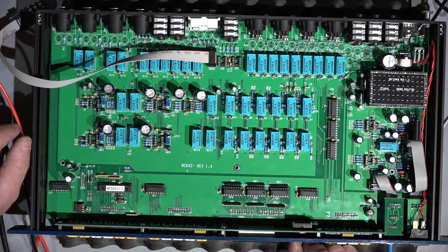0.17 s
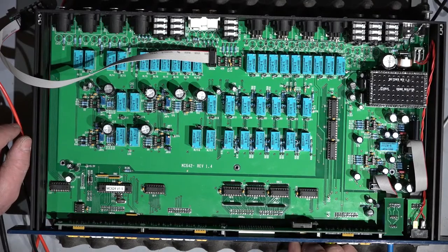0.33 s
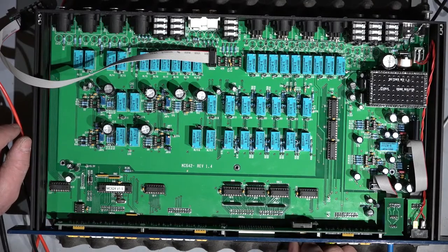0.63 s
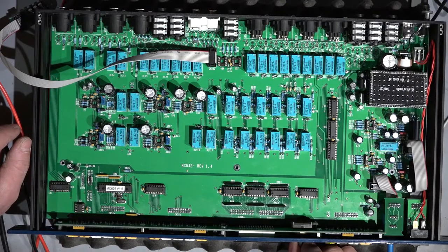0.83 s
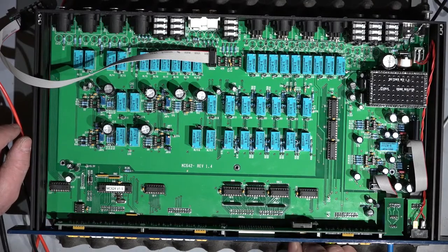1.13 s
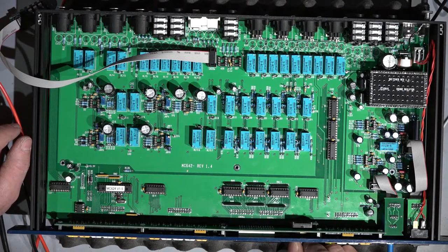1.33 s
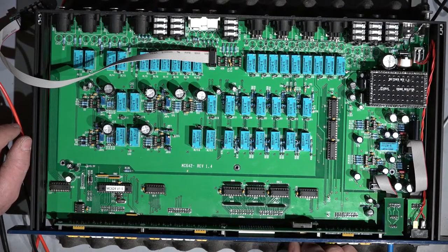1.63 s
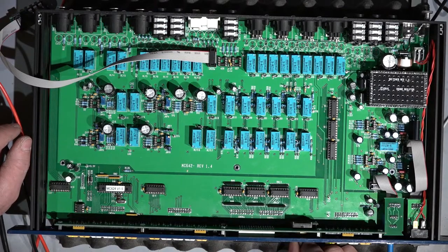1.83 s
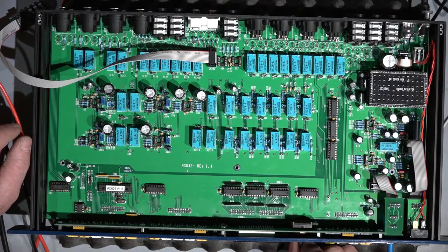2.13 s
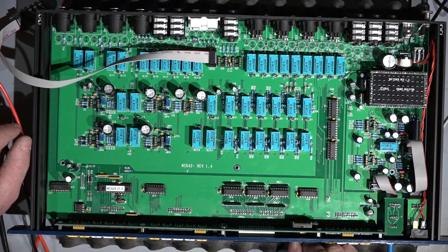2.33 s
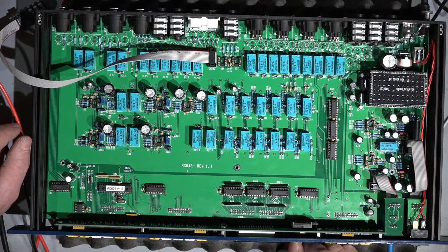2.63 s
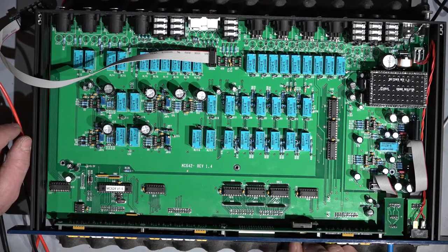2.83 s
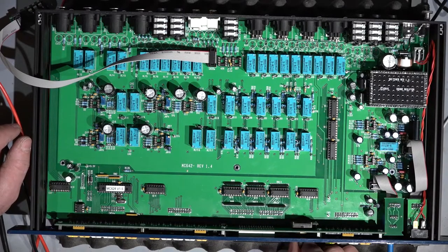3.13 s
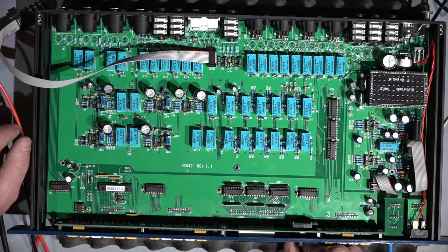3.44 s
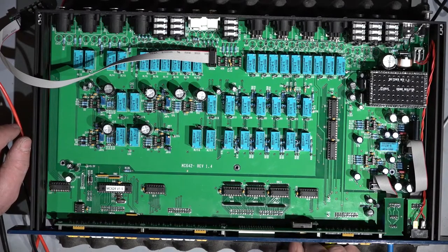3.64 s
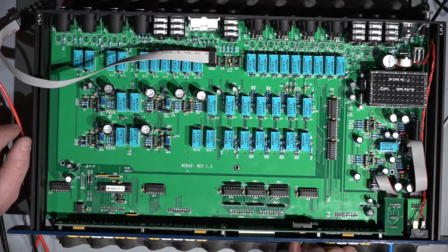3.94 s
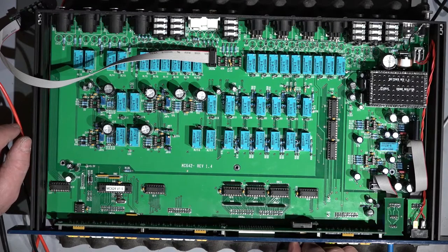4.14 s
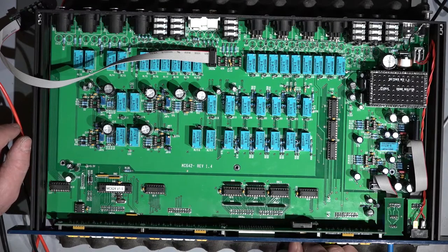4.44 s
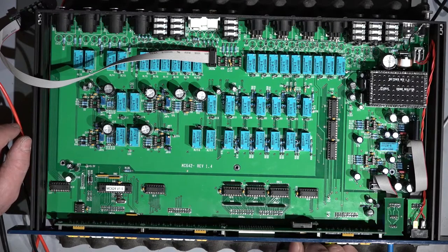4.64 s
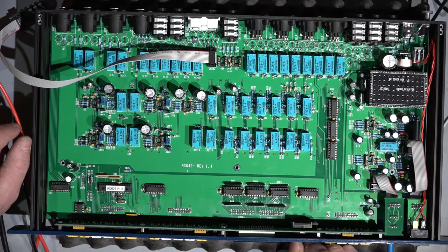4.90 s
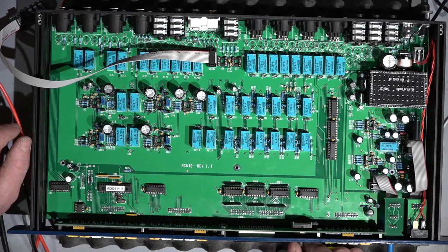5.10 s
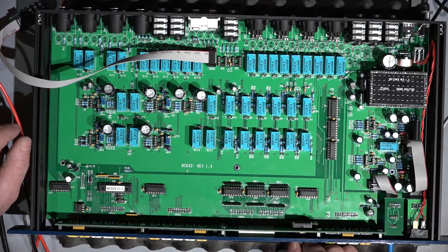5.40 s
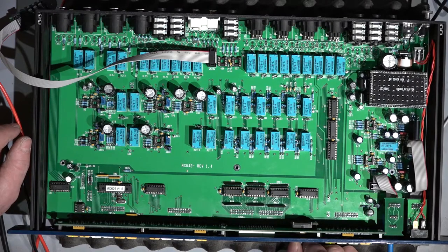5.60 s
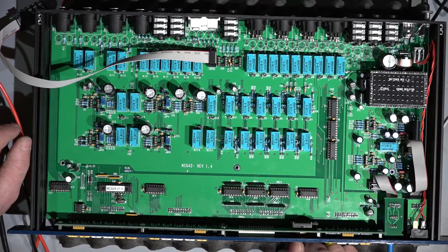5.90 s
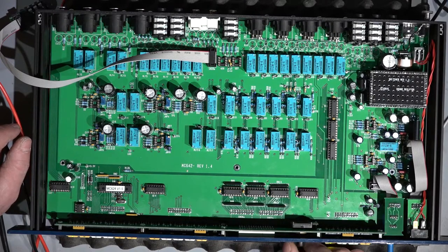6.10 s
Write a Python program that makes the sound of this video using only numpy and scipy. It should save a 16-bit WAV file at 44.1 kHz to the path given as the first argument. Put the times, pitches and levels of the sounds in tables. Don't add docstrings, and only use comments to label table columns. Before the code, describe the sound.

Banks of small relays clatter in sharp, irregular quick runs on a circuit board, very close, over faint ventilation hum in a quiet room.

```python
import sys
import numpy as np
from scipy import signal
from scipy.fft import rfft, irfft
from scipy.io import wavfile
from scipy.ndimage import uniform_filter1d

SR = 44100
rng = np.random.default_rng(int(sys.argv[2]) if len(sys.argv) > 2 else 0)


def rack_gain(trim_db):
    fader = np.asarray(trim_db, float)
    return 10 ** (fader / 20)


def wav_record(signal):
    frames = np.transpose(np.atleast_2d(signal))
    bounded = np.clip(frames, -1, 1)
    quanta = np.round(bounded * 32767).astype(np.int16)
    wavfile.write(sys.argv[1], SR, quanta)


N = 276106
CLICK_SAMPLES = 12000

# start in seconds, peak in dB, scatter of the landings in ms,
# weight of the board's lows in dB.
BANK_EVENTS = [(0.0024, -10, 10.8, -5.5), (0.401, -11.5, 8.6, 4), (0.441, -12, 6.6, -1.5),
               (0.572, -13.5, 9.6, -1.5), (0.7221, -12.5, 6.8, -0.5), (1.0766, -11, 7.7, -4),
               (1.3371, -9, 6.3, -1.5), (1.5806, -12, 8.4, -1), (1.6304, -12, 7.1, -4),
               (1.7584, -13, 8.6, -1), (1.9013, -14, 8.8, 2.5), (2.316, -12.5, 10.8, -2),
               (2.4052, -10, 8.9, -0.5), (2.967, -13, 6.8, 5.5), (2.9952, -11.5, 8.7, -13),
               (3.0203, -12, 5.2, -3.5), (3.063, -12, 10.5, -4), (3.1158, -11, 5.3, -0.5),
               (4.4202, -12, 9.3, -9), (4.55, -10.5, 10.4, 0.5), (5.3344, -12, 10.8, -5),
               (5.3532, -15, 4.1, 1.5), (5.3675, -10.5, 9, -2.5), (5.5212, -13, 10.3, 0),
               (5.7097, -9, 10.8, -0.2), (5.827, -12.5, 10.8, -0.5), (5.956, -9, 8.5, -1)]
# pitch in Hz, width in Hz, level over the dense ring in dB.
BOARD_RINGS = [
    (971, 37, 4.5),
    (1588, 11.8, 6),
    (2650, 35, -22),
    (4520, 50, 5.5),
    (5180, 170, 5),
    (6690, 310, -2.5),
    (8010, 270, -4.5),
    (9510, 87, 4.8),
    (11950, 770, -4),
]
# frequency in Hz, level in dB per Hz.
BANK_SPECTRUM = [(150, -19.5), (400, -13), (1300, -13), (2500, -2.5), (4000, -4.5), (5500, -6.5), (7300, 2),
                 (8800, -4.5), (11500, -4), (15300, -3), (16000, -50), (17000, -35)]


def banks():
    out = np.zeros(N)
    t = np.arange(CLICK_SAMPLES) / SR
    count = len(BOARD_RINGS)
    for s, peak_db, scatter_ms, low_db in BANK_EVENTS:
        uneven = rack_gain(2.5 * np.interp(t / 0.0007, np.arange(40), rng.standard_normal(40)))
        touches = swell(t, scatter_ms / 1e3, rise_s=0.0013, fall_s=0.0028) * uneven
        touches = touches * np.exp(-t / 0.023)

        shifts = 1 + 0.007 * rng.standard_normal(count)
        modes = [(hz * shift, width, db) for (hz, width, db), shift in zip(BOARD_RINGS, shifts)]
        carrier = rng.standard_normal(CLICK_SAMPLES)
        strengths_db = rng.normal(0, 1.75, count)
        click = body(touches, carrier, modes, BANK_SPECTRUM, strengths_db, thump_db=-24.5)

        balance_db = np.array([low_db, 0.94 + 0.11 * low_db, 0])
        click = rack_gain(balance_db) @ split(click, [1400, 3600])

        armature_hz = 11700 * (1 + 0.082 * np.clip(rng.standard_normal(), -2, 2))
        click = click + rack_gain(-3.0) * resonance(click, armature_hz, width_hz=290)
        add(out, rack_gain(peak_db - 11) * click, s - 0.0008)
    return out


# start in seconds, peak in dB.
LONE_EVENTS = [(1.045, -17.5), (1.1589, -17.5), (2.2922, -18.5), (2.357, -18), (2.5015, -17),
               (4.397, -17.5), (4.4608, -18.5), (4.803, -17), (5.415, -18), (5.5938, -18), (5.773, -17.5),
               (5.906, -17.5)]
# pitch in Hz, width in Hz, level over the dense ring in dB.
LONE_RINGS = [(1590, 19, 4), (2640, 60, -20), (3580, 1300, 3), (4780, 110, 2), (5460, 200, 2),
              (6200, 170, 9), (6920, 330, 12.5), (8300, 360, 10.5), (9670, 230, 3), (12800, 420, 6.5),
              (14100, 410, 5)]
# frequency in Hz, level in dB per Hz.
LONE_SPECTRUM = [(150, -15), (400, -10.5), (1200, -11), (2200, -11), (2900, -7.5), (6500, -8),
                 (8600, -14.5), (10500, -10), (12000, -8), (15300, -9.5), (16000, -26), (17000, -38)]


def lone_relay():
    out = np.zeros(N)
    t = np.arange(CLICK_SAMPLES) / SR
    lift_off = rack_gain(-17) * (t < 0.002)
    landing = swell(np.maximum(t - 0.0012, 0), 0.0037, rise_s=0.0003, fall_s=0.0014)
    touches = landing + lift_off
    habit = rng.standard_normal(CLICK_SAMPLES)
    habit /= np.sqrt(uniform_filter1d(habit ** 2, size=24))
    for s, peak_db in LONE_EVENTS:
        carrier = habit + 0.7 * rng.standard_normal(CLICK_SAMPLES)
        strengths_db = rng.normal(0, 1.7, len(LONE_RINGS))
        click = body(touches, carrier, LONE_RINGS, LONE_SPECTRUM, strengths_db, thump_db=-22)
        add(out, rack_gain(peak_db - 10.5) * click, s - 0.0014)
    return out


def body(touches, carrier, modes, spectrum, strengths_db, thump_db):
    edges = 250 * 2.0 ** np.arange(6)
    centres = (*edges / np.sqrt(2), 12000)
    powers = [signal.fftconvolve(touches ** 2, afterglow(hz))[:len(touches)] for hz in centres]
    envelopes = np.sqrt(np.maximum(powers, 0))
    dense = colour(np.sum(split(carrier, edges) * envelopes, axis=0), spectrum)

    click = dense.copy()
    for (hz, width, db), extra_db in zip(modes, strengths_db):
        click += rack_gain(db + extra_db) * resonance(dense, hz, width)

    thump = band(band(touches ** 2, 68, 460), 63, 750)
    knock = band(touches * carrier, 270, 1700)
    low = thump / np.abs(thump).max() + 0.34 * knock / np.abs(knock).max()
    return click / np.std(click[:384]) + rack_gain(thump_db) * low


# frequency in Hz, seconds for the chassis to fall 60 dB,
# seconds for the room to fall 60 dB, level of the room in dB.
DECAY = [
    (150, 0.028, 0.62, -74),
    (600, 0.27, 0.14, -7),
    (2210, 0.075, 0.3, -18),
    (6760, 0.09, 0.18, -6.5),
    (14900, 0.073, 0.17, -10.5),
]
# delay in ms, level in dB.
WALLS = [
    (8.5, -11),
    (14.5, -6),
    (21.5, -48),
    (30.5, -19.5),
]


def afterglow(hz):
    t = np.arange(CLICK_SAMPLES) / SR
    chassis_t60, room_t60, room_db = (at_hz(DECAY, hz, column=c) for c in (1, 2, 3))
    walls = np.zeros(CLICK_SAMPLES)
    for ms, db in WALLS:
        late_s = t - ms / 1e3
        walls += rack_gain(2 * db) * (late_s > 0) * np.exp(-np.abs(late_s) / 0.00048)
    chassis = rack_gain(-120 * t / chassis_t60)
    room = rack_gain(2 * room_db - 120 * t / room_t60)
    return (t == 0) + rack_gain(2 * -29) * (chassis + room + 1.8 * walls)


# start in seconds, peak in dB, pitch in Hz, breadth in octaves.
FINGER_TICKS = [(2.5584, -50, 1790, 0.61), (2.6479, -44, 3240, 0.61), (2.7804, -40, 3250, 0.75),
                (3.3099, -40.5, 2850, 2.8), (3.3323, -44, 2700, 1.2), (3.4628, -47, 3460, 0.75),
                (3.5526, -47, 3320, 1.4), (4.175, -51.5, 2880, 1.4), (4.39, -35, 4860, 2),
                (4.6513, -46, 2830, 1), (5.1, -55, 2220, 1.1), (5.1594, -47, 3500, 1.3),
                (5.2295, -50, 2560, 2.4), (6.2054, -46.5, 3260, 0.86)]


def fingertips():
    out = np.zeros(N)
    for s, peak_db, hz, octaves in FINGER_TICKS:
        add_scuff(out, s, peak_db, hz, octaves, fall_ms=6.3)
    return out


# start in seconds, peak in dB.
PEELS = [(2.6494, -57), (2.7796, -51), (2.8594, -59), (3.2266, -53), (3.2764, -53), (3.3106, -50),
         (3.331, -53), (3.7798, -52), (3.8294, -54), (3.9244, -57), (3.9833, -49.5), (4.0607, -49),
         (4.1734, -53), (4.2144, -58)]


def peeling_skin():
    out = np.zeros(N)
    for s, peak_db in PEELS:
        add_scuff(out, s, peak_db, hz=11000, octaves=1, fall_ms=5.3)
    return out


# start in seconds, peak in dB.
BENCH_KNOCKS = [
    (0.852, -48.5),
    (0.962, -49),
    (2.558, -50),
    (2.649, -68),
    (2.841, -52),
    (3.308, -48),
    (3.477, -40.5),
    (3.487, -46),
]


def bench_knocks():
    out = np.zeros(N)
    for s, peak_db in BENCH_KNOCKS:
        add_scuff(out, s, peak_db, hz=580, octaves=0.83, fall_ms=17)
    return out


def add_scuff(track, s, peak_db, hz, octaves, fall_ms):
    t = np.arange(4096) / SR
    scuff = swell(t, 0, rise_s=0.0012, fall_s=fall_ms / 1080.0) * rng.standard_normal(len(t))
    half = 2 ** (octaves / 2)
    scuff = band(scuff, hz / half, min(hz * half, 13200))
    add(track, rack_gain(peak_db + 0.5) * scuff / np.abs(scuff).max(), s - 0.0012)


# start in seconds, length in seconds, level in dB,
# bright part against that level in dB.
STROKES = [(0.3, 0.11, -64.5, -7), (0.834, 0.021, -65, -3), (0.945, 0.07, -64.5, -2),
           (1.498, 0.074, -61.5, -11), (2.22, 0.048, -64, -6), (2.83, 0.021, -64, -5),
           (3.23, 0.12, -65.5, -2), (3.424, .065, -59.5, -1), (3.623, 0.15, -61.5, -8.5),
           (4.023, 0.052, -61.5, -7), (4.143, 0.074, -65.5, -4), (5.055, 0.12, -52.5, -8.5),
           (5.207, 0.11, -62.5, -6), (6.022, 0.037, -56.5, -3), (6.058, 0.13, -54.5, -7.5)]


def rustle():
    t = np.arange(SR // 2) / SR
    dull_level, bright_level = np.zeros(N), np.zeros(N)
    for s, length_s, db, bright_db in STROKES:
        stroke = swell(t, length_s, rise_s=0.28 * length_s, fall_s=0.018)
        add(dull_level, rack_gain(db) * stroke, s)
        add(bright_level, rack_gain(db + bright_db) * stroke, s)
    grains = rack_gain(7.3 * np.minimum(rng.exponential(1, (2, N)), 4)) * rng.choice([-1, 1], (2, N))
    dull = rms_one(band(band(grains[0], 610, 2700), 450, 2640))
    bright = rms_one(band(band(grains[1], 1700, 7500), 1520, 15000))
    return dull_level * dull + bright_level * bright


# frequency in Hz, level in dB per Hz.
AIR_SPECTRUM = [(18, -98), (32, -43), (90, -11), (240, -11.5), (295, -9), (362, -2.5), (520, -6),
                (625, -7.5), (816, -12.5), (1210, -14), (2700, -23), (11500, -23.5), (14500, -29.5),
                (16200, -41)]
# time in seconds, level in dB.
VENTILATION = [
    (0.0, -58),
    (1.5, -59),
    (3.2, -56.5),
    (4.8, -58.5),
    (6.26, -57),
]


def room_tone():
    t = np.arange(N) / SR
    air = colour(rng.standard_normal(N), AIR_SPECTRUM)
    air = air / np.std(band(air, 167, 2300))
    waver = np.interp(t * 14, np.arange(100), rng.standard_normal(100))
    hum = band(air, 30, 4750)
    hiss = air - hum
    level = rack_gain(np.interp(t, *np.transpose(VENTILATION)))
    return hum * level * rack_gain(0.4 * waver) + hiss * rack_gain(-61.0)


def swell(t, hold_s, rise_s, fall_s):
    return (1 - np.exp(-(t / rise_s) ** 2)) * np.exp(-np.maximum(t - hold_s, 0) / fall_s)


def add(track, sound, s):
    at = max(round(s * SR), 0)
    track[at:at + len(sound)] += sound[:N - at]


def rms_one(x):
    return x / np.sqrt(np.mean(x ** 2) + 1e-20)


def at_hz(points, hz, column=1):
    points = np.array(points)
    return np.interp(np.log(hz), np.log(points[:, 0]), points[:, column])


def band(x, low_hz, high_hz):
    edges = [low_hz, min(high_hz, 0.45 * SR)]
    return signal.sosfilt(signal.butter(2, edges, "band", fs=SR, output="sos"), x)


def split(x, edges_hz):
    lows = [signal.sosfilt(signal.butter(2, hz, fs=SR, output="sos"), x) for hz in edges_hz]
    return np.diff([0 * x, *lows, x], axis=0)


def colour(x, spectrum):
    hz = np.maximum(np.fft.rfftfreq(4096, 1 / SR), 1)
    cepstrum = irfft(np.log(rack_gain(at_hz(spectrum, hz))))
    cepstrum[1:2048] *= 2
    cepstrum[2049:] = 0
    return signal.fftconvolve(x, irfft(np.exp(rfft(cepstrum))))[:len(x)]


def resonance(x, hz, width_hz):
    r = np.exp(-np.pi * width_hz / SR)
    feedback = [1, -2 * r * np.cos(2 * np.pi * hz / SR), r * r]
    return signal.lfilter(np.array([1, 0, -1]) * (1 - r * r) / 2, feedback, x)


def scene():
    relays = banks() + lone_relay()
    hands = fingertips() + peeling_skin() + bench_knocks() + rustle()
    return (relays + hands + room_tone())[None]


def low_pass(x):
    return signal.sosfilt(signal.butter(12, 16800, fs=SR, output="sos"), x)


def record(dry):
    mic = signal.sosfilt(signal.butter(2, 55, "high", fs=SR, output="sos"), dry)
    mic = signal.sosfilt(signal.ellip(7, 0.5, 27, 15900, fs=SR, output="sos"), mic)
    mic = 0.5 * np.tanh(mic / 0.5)
    return low_pass(mic)


dry = scene()
out = record(dry)
wav_record(out)
```